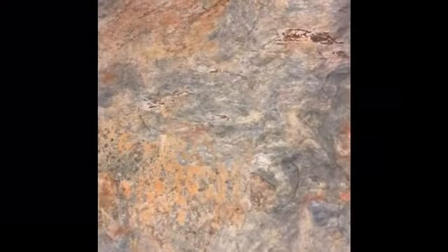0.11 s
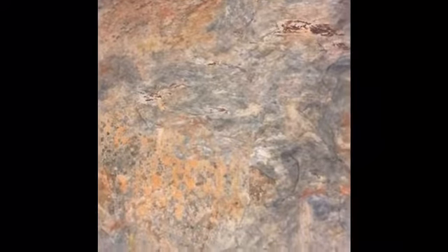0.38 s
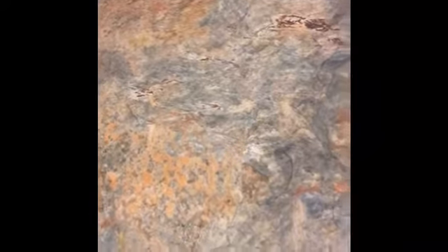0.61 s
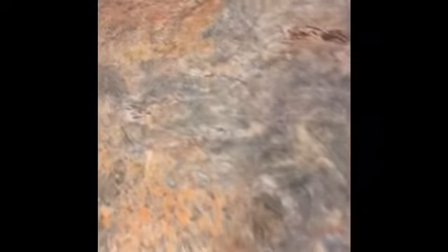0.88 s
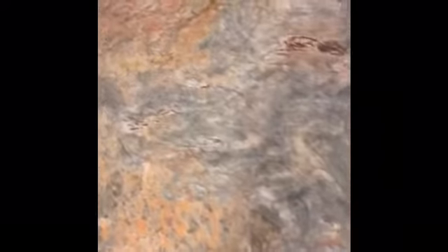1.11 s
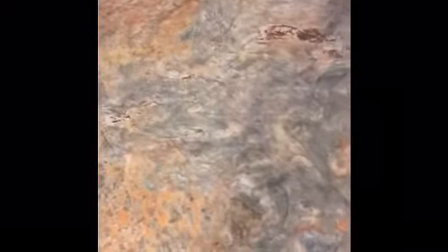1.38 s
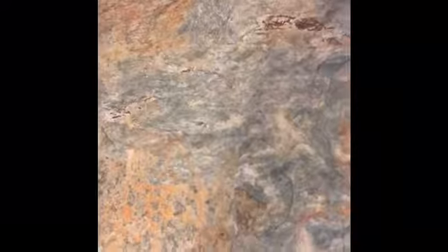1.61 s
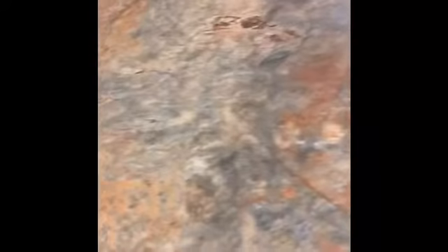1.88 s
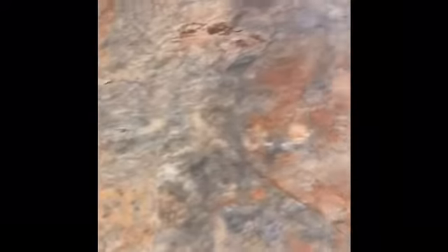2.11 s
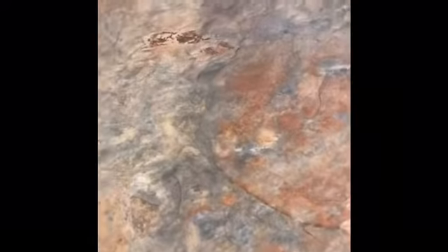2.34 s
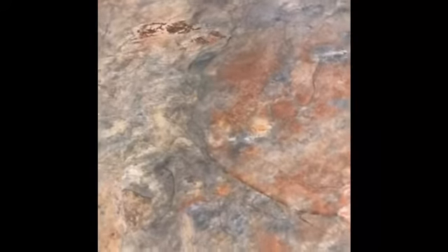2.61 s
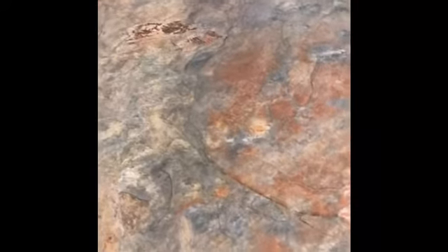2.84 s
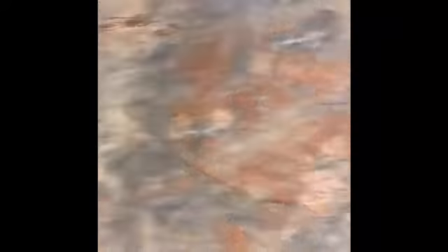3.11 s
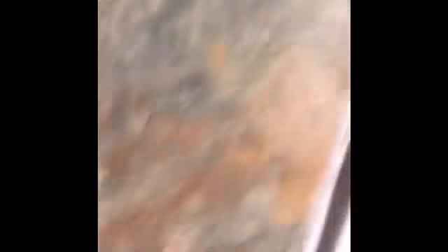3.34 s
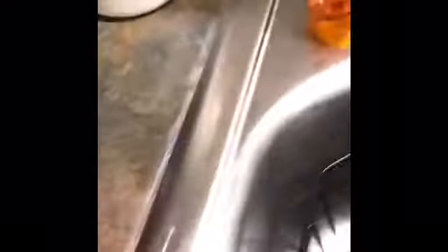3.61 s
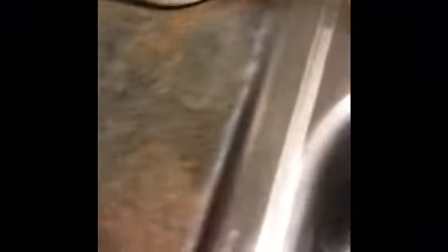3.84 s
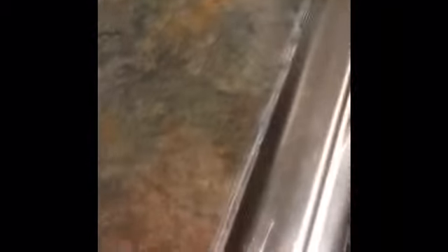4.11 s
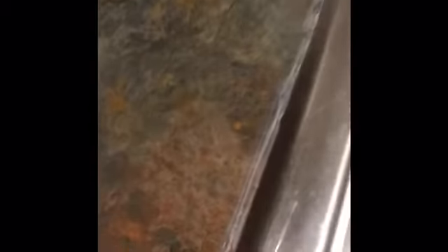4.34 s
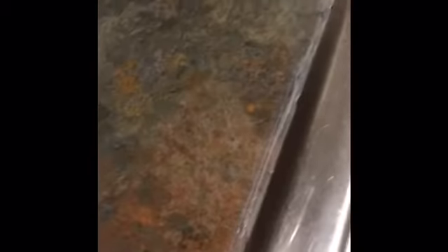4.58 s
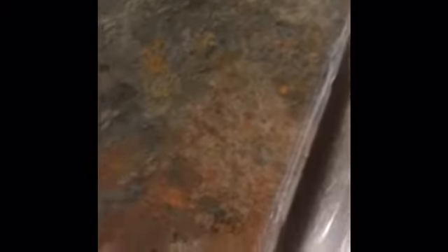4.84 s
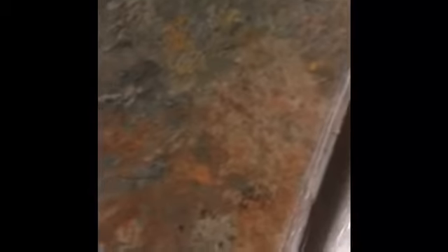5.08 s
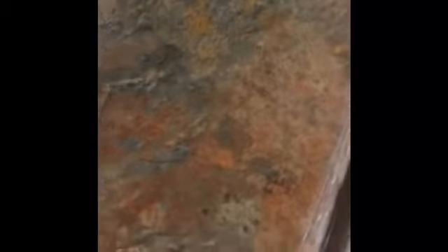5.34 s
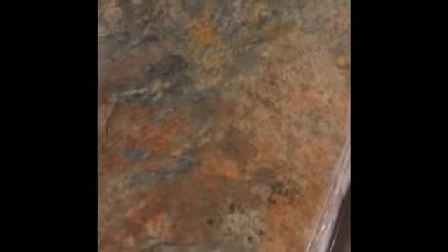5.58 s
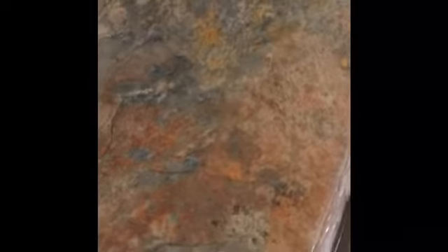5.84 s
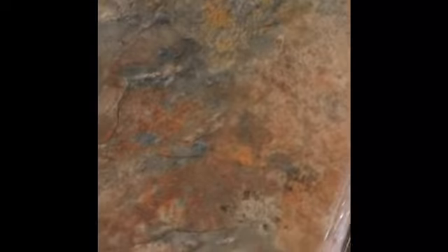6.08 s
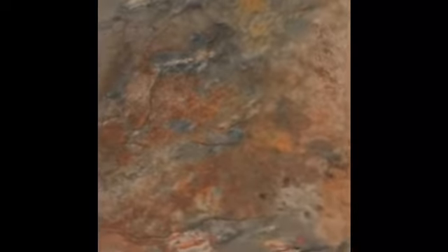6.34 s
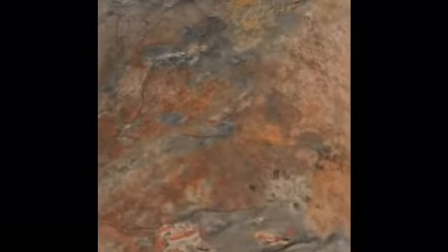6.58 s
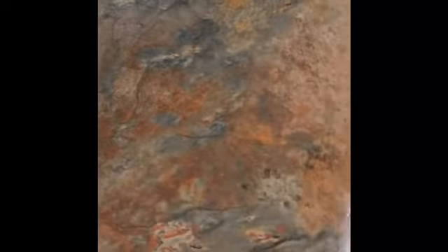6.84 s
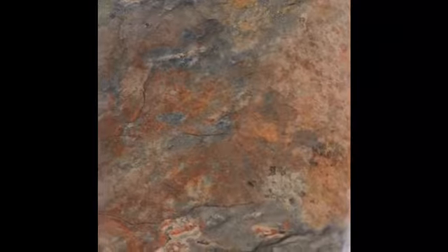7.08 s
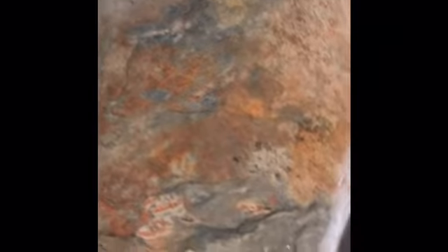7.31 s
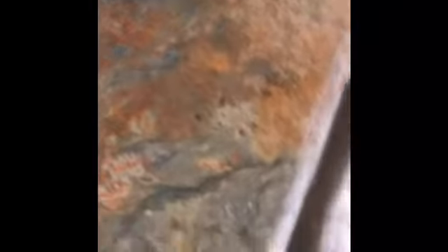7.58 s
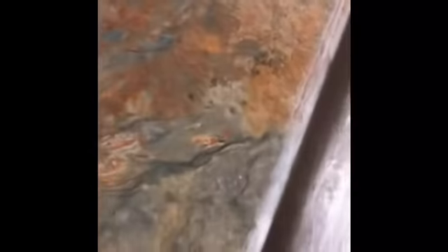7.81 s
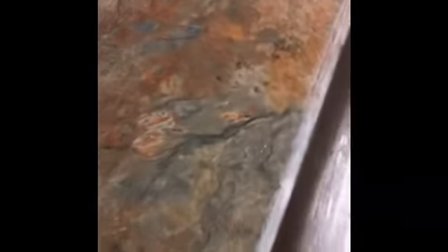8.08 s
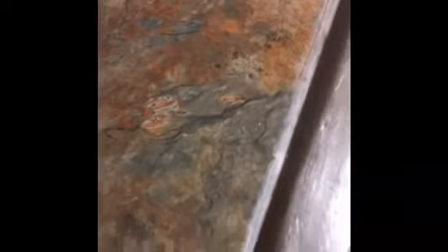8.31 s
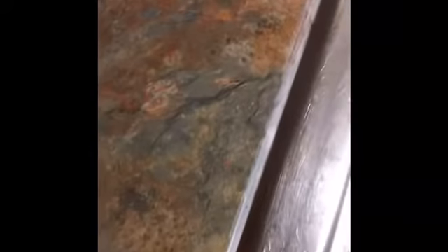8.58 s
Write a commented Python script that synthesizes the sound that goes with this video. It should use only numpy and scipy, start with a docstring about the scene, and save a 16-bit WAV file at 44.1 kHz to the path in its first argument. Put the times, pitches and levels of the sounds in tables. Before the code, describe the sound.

Tap water hisses and splashes hard into a steel pot in a metal sink, then shuts off to thuds, fizzing froth and drips.

```python
"""Water hisses and splashes hard into a steel pot in a steel sink, over a pot note that slowly sinks; then the tap
is shut, the sink thuds, froth fizzes out and drips fall over a low rumble and hum.
The jet, pot notes, froth and rumble are filtered noise; drips and plops are short bubble tones, the drips with
noisy splats; thuds are sets of fading sink tones.
A hand-held mono microphone drifts along the counter, which changes the loudness and colour of the water."""
import sys
import numpy as np
from scipy import signal
from scipy.fft import rfft, irfft, next_fast_len
from scipy.io import wavfile
from scipy.ndimage import map_coordinates

SR = 44100
rng = np.random.default_rng(int(sys.argv[2]) if len(sys.argv) > 2 else 0)


def nominal_scale(level):
    """Amplitude ratio for a level in decibels (scalar or array-like)."""
    x = np.asarray(level, float) / 20
    return 10 ** x


def int16_out(signal):
    """Quantize to a 16-bit WAV file."""
    q = np.round(np.clip(np.atleast_2d(signal).T, -1, 1) * 32767)
    wavfile.write(sys.argv[1], SR, q.astype(np.int16))


N = 383229  # length [samples]
FRAME, HOP = 2048, 512  # noise-shaping window and its step [samples]
HZ = np.fft.rfftfreq(FRAME, 1 / SR)[:, None]  # frequencies of the shaping grid
TIMES = np.arange(N // HOP + 6) * HOP / SR  # moments of the shaping grid [s]

# The moving hand: (time [s], distance [fresh reflection patterns], open view of the sink [0-1], nearness gain [dB])
TRAVEL = [(0, 0, 0.3, 1), (.9, 1.2, 0, 0), (3, 4, 0, 0.5), (3.63, 6, 0.3, 3.5), (3.9, 7, 0.5, 1.95),
          (4.7, 8.8, 0.6, 1.8), (6.1, 10.8, 1, .8), (6.5, 11.3, 0.5, 0.2), (7.7, 13, 0, 0)]
# Thuds on the sink: (time [s], level before a fixed trim [dB], clack relative to thud before a fixed lift [dB])
THUDS = [(7.393, -35, -18), (7.489, -38, 1), (7.648, -27.5, -18), (7.707, -39, -18), (8.173, -29, -27),
         (8.187, -24, -36), (8.229, -28, -30), (8.266, -29.5, -29), (8.332, -36.5, -3), (8.397, -35, -18),
         (8.509, -36.5, -10.5), (8.545, -38, -11)]
SHUT_S = 7.474  # the tap closes
HEAVY_S = 4.5  # the pot is heavy enough to shake the sink fully
FROTH_S = 7.58  # the froth begins to be heard


def unit(x):
    """Scales a sound to an rms of 1."""
    return x / np.sqrt(np.mean(x ** 2) + 1e-20)


def along(points, hz):
    """Reads (frequency [Hz], value) points on a log frequency axis."""
    f, v = np.transpose(points)
    return np.interp(np.log(hz + 1), np.log(f + 1), v)


def curves(rows, t=None):
    """Reads each column after the time, at t or at every sample."""
    s, *cols = np.transpose(rows)
    at = np.arange(N) / SR if t is None else t
    return [np.interp(at, s, c) for c in cols]


def since(s, ease=.005):
    """Seconds after moment s, near zero before it, with a rounded corner."""
    return ease * np.logaddexp(0, (np.arange(N) / SR - s) / ease)


def wobble(rate):
    """A smooth random curve with rate knots a second."""
    return map_coordinates(rng.standard_normal(N // 100), [np.arange(N) * rate / SR])


def patches(wide_hz, moments):
    """A random field over frequency and time: new values every wide_hz and at each whole step of moments."""
    grid = np.meshgrid(HZ[:, 0] / wide_hz, moments, indexing="ij")
    return map_coordinates(rng.standard_normal((400, 300)), grid, mode="wrap")


def peak(hz, width_hz):
    """Gain of a resonance over frequency, 1 at its centre."""
    return 1 / (1 + ((HZ - hz) / (width_hz / 2)) ** 2)


def shaped(gain, drive=None):
    """Noise (or drive) filtered by a gain over frequency and time, the gain scaled to power 1 at every moment."""
    drive = rng.standard_normal(N) if drive is None else drive
    z = signal.stft(drive, nperseg=FRAME, noverlap=FRAME - HOP)[2]
    gain = np.broadcast_to(gain, (len(HZ), len(TIMES)))[:, :z.shape[1]]
    gain = gain / np.sqrt(np.mean(gain ** 2, axis=0))
    return signal.istft(z * gain, nperseg=FRAME, noverlap=FRAME - HOP)[1][:N]


def add(track, s, sound):
    """Mixes a sound into the track at second s."""
    track[round(s * SR):][:len(sound)] += sound


def jet():
    """Air-filled stream: smooth hiss and splash, coloured by steel resonances and by shifting reflections."""
    # hiss heard from behind the counter edge, and with the sink in open view:
    # (frequency [Hz], relative level [dB])
    shaded_hiss = [(1500, -17), (2800, -9.5), (3500, -4), (4100, -1.5), (4800, -2.4), (5400, 1), (6200, .3),
                   (7700, -5.2), (9000, -1.8), (10450, -7.5), (11300, -2.3), (13000, -1.5), (15450, 4.2),
                   (16000, 3.5)]
    open_hiss = [(1500, -17), (2800, -8.5), (3500, -3.5), (4500, -1.3), (5400, 2.5), (6700, 1.8),
                 (7300, -5.5), (9000, -2.8), (10400, -8.5), (11300, -3), (12500, -2.5), (14200, .8),
                 (15100, 4), (16000, 4)]
    # the splash in the pot: (frequency [Hz], relative level [dB])
    splash_tone = [(280, -74), (470, -19.5), (613, -7), (1020, -6.5), (1360, -2), (1720, 0.5), (1910, -3.5),
                   (2230, -0.5), (2840, -4.5), (3200, -5.5), (4160, -26), (7040, -120)]
    # steel resonances, each beamed toward one stretch of the hand's path: (frequency [Hz], width [Hz],
    # boost [dB], lobe centre [reflection patterns], lobe half-width [reflection patterns])
    steel = [(625, 70, 3, 12, 1.5), (1355, 80, 4.5, 6, 7), (1680, 130, 3, 2.1, 2.6),
             (1760, 110, 3.5, 11, 2.5), (2210, 100, 3.5, 5, 8), (2590, 80, 2.5, 9.6, 1.5),
             (3055, 75, 4, 2.1, 2.5), (3670, 55, 4, 3.1, 1), (3630, 50, 4, 11.5, 1.8),
             (4100, 50, 3.5, 6, 8), (4310, 55, 3, 6, 8), (4800, 130, 4, 9.9, 1.5), (5110, 80, 3.5, 11, 1),
             (5120, 70, 4, 2.5, .7), (5350, 600, 4, 6.6, 1.5), (5460, 90, 3.5, 12, 1.2),
             (5740, 80, 3, 6, 8), (5900, 90, 3.5, 5, 1.1), (6600, 150, 3, 11, 2.2), (8630, 60, 4, 9.8, .8),
             (8940, 200, 2, 6, 9), (11690, 70, 4, 3.3, .9), (12900, 75, 4, 10, 1.1)]
    hiss_db, hiss_fall_db_s = -22.5, 146  # level before nearness; fall once shut
    splash_db, splash_fall_db_s = -38, 79
    splash_near = 0.76  # share of the nearness gain that the splash follows
    lobe_edge = 0.93  # stretch of path over which a lobe fades in

    travel, view, _ = curves(TRAVEL, TIMES)
    near_db = curves(TRAVEL)[2]
    shut = since(SHUT_S, ease=0.014)
    steel_db = 0
    for hz, width, db, centre, half in steel:
        lobe = np.clip((half - abs(travel - centre)) / lobe_edge + .5, 0, 1)
        steel_db = steel_db + db * peak(hz, width) * lobe
    # nearby surfaces draw fine ripples in the spectrum that change as the microphone moves
    ripple = patches(58, travel)
    ripple_db = 2.8 * ripple - .5 * ripple ** 2  # interference cuts deeper than it lifts
    colour = nominal_scale(steel_db + ripple_db)

    hiss_tone_db = (1 - view) * along(shaded_hiss, HZ) + view * along(open_hiss, HZ)
    hiss = shaped(colour * nominal_scale(hiss_tone_db))
    splash = shaped(colour * nominal_scale(along(splash_tone, HZ)))
    hiss_gain = nominal_scale(hiss_db + near_db - hiss_fall_db_s * shut)
    splash_gain = nominal_scale(splash_db + splash_near * near_db - splash_fall_db_s * shut)
    flutter_db = .4 * wobble(9)
    return nominal_scale(flutter_db) * (hiss_gain * hiss + splash_gain * splash)


def note(hz, db, breadth, throb_db, lift_db=0):
    """Turbulence drives one mode: narrow noise on a fixed or moving pitch, in uneven throbs."""
    still_s = 7.8  # the pot falls still
    fade = np.clip((still_s - np.arange(N) / SR) / 0.065, 0, 1)
    tone = shaped(peak(hz, breadth * hz) ** 0.86 * nominal_scale(lift_db))
    return fade * nominal_scale(db + throb_db * wobble(9)) * tone


def pot():
    """The lowest note sinks as water loads the walls; the bare bottom and a sink mode sound with it."""
    # sink modes that lift the note as it passes: (frequency [Hz], width [Hz], lift [dB])
    sink_lift = [(240.4, 13, 8), (337, 22, 7), (370, 29, 8)]
    full_s = 7.4  # the water's load stops growing
    empty_hz, load = 445.6, 0.85  # pitch = empty pitch / (1 + load * depth)
    pot_db, wet_s = -46.5, 1.14  # base level; time to speak
    pot_near, settle_db = 0.48, -2  # share of the nearness gain; loss once full
    bottom_hz, bottom_db, bottom_sag_hz_s = 668, -45, 165  # bare bottom, and its sinking once covered
    covered_s = .22  # the first water drowns the bottom note
    drowned_db, drown_s, drown_db_s = -7, .08, 9  # quick loss, its time, the slow fade after
    bowl_hz, bowl_db, bowl_grows_db = 363, -57, 7  # a sink mode, shaken harder until the pot is heavy

    t = np.arange(N) / SR
    depth = np.sin(np.pi / 2 * np.minimum(TIMES / full_s, 1))
    speaks_db = 20 * np.log10(1 - np.exp(-(t / wet_s) ** 2) + 0.043)
    settled_db = settle_db * np.minimum(t / full_s, 1) ** 4
    lowest_db = pot_db + speaks_db + pot_near * curves(TRAVEL)[2] + settled_db
    lift_db = sum(db * peak(hz, width) for hz, width, db in sink_lift)
    lowest = note(empty_hz / (1 + load * depth), lowest_db, breadth=0.27, throb_db=1.8, lift_db=lift_db)

    sinking_hz = np.maximum(bottom_hz - bottom_sag_hz_s * np.maximum(TIMES - covered_s, 0), 300)
    covered = since(covered_s)
    fading_db = bottom_db + drowned_db * np.tanh(covered / drown_s) - drown_db_s * covered
    bottom = note(sinking_hz, fading_db, breadth=0.055, throb_db=-1.0)

    growing_db = bowl_db - bowl_grows_db * (1 - np.minimum(t / HEAVY_S, 1))
    bowl = note(bowl_hz, growing_db, breadth=0.1, throb_db=2.5)
    return lowest + bottom + bowl


def ring(modes, t, attack):
    """Fading tones of struck steel, at new strengths and slightly new pitches for each blow."""
    total = 0
    for (hz, db, t60), chance in zip(modes, rng.standard_normal(len(modes))):
        tone = np.sin(2 * np.pi * hz * (1 + 0.0066 * chance) * t)
        total = total + nominal_scale(db + 1.9 * chance - 60 * t / t60) * tone
    return (1 - np.exp(-t / attack)) * total


def thuds():
    """Soft blows ring the sink bowl; their hard edge clacks the upper modes with a short scuff."""
    # sink bowl modes: (frequency [Hz], relative level [dB], time to fall 60 dB [s])
    bowl_modes = [(82.7, 0.5, 0.3), (107.8, -6, 0.88), (189, -4.5, 0.25), (259, -10, 0.14), (316, -3, 0.13),
                  (372, -17, 0.77), (463, -13, 0.094), (570, -12, 0.07)]
    # upper modes, rung by hard contact: (frequency [Hz], relative level [dB], time to fall 60 dB [s])
    rim_modes = [(646, 2, 0.11), (850, -11, 0.65), (944, -1, 0.11), (1104, 0, 0.15), (1310, -4, 0.15),
                 (1450, -4, 0.17), (1830, -10, .06)]
    out, t = np.zeros(N + SR), np.arange(SR // 2) / SR
    for s, db, clack_db in THUDS:
        rough = np.convolve(rng.standard_normal(len(t)), np.hanning(14) / 3, "same")
        scuff = 0.92 * rough * nominal_scale(-60 * t / 0.23)
        thud = ring(bowl_modes, t, attack=0.0024)
        clack = ring(rim_modes, t, attack=0.005) + scuff
        add(out, s, nominal_scale(db - 7.5) * (thud + nominal_scale(clack_db + 4) * clack))
    return out[:N]


def spray(spikes, size_db):
    """White noise plus droplet ticks of scattered but bounded size."""
    hit, size, sign = rng.random((3, N))
    tick_size = nominal_scale(-size_db * np.log(size + .02))
    ticks = (hit < .03) * tick_size * np.sign(sign - .5)
    return unit(rng.standard_normal(N) + spikes * unit(ticks))


def froth():
    """Bursting froth and a trickle, uncovered as the jet dies, with the sink still singing faintly."""
    # trickle and fizz: (frequency [Hz], relative level [dB])
    trickle_tone = [(110, -20), (180, -2), (219, -23), (257, -13), (285, -5.5), (446, -15.5), (483, -11.5),
                    (951, -20), (1370, -16), (1920, -23.5), (2800, -44), (3640, -52), (6160, -120)]
    fizz_tone = [(1290, -28), (2200, -7.5), (2680, -2.5), (3160, -5), (3520, -5.5), (7710, -11),
                 (8650, -8.5), (10500, -16), (12600, -12), (15800, -13)]
    # the sink singing under the trickle: (frequency [Hz], width [Hz], level [dB rms])
    sink_song = [(1378, 30, -62), (5380, 80, -74)]
    gurgle_db, gurgle_fall_db_s, trickle_db = -32.5, 142, -56.5  # first gurgle over a lasting trickle
    fizz_db, fizz_fall_db_s, fizz_patch_db = -45, 20.5, 2  # start, fall, unevenness

    after = since(FROTH_S)
    rise = np.clip(after / 0.2, 0, 1)
    low = nominal_scale(gurgle_db - gurgle_fall_db_s * after) + nominal_scale(trickle_db)
    trickle = low * nominal_scale(2.3 * wobble(25)) * shaped(nominal_scale(along(trickle_tone, HZ)))
    uneven_db = fizz_patch_db * patches(450, TIMES / 0.025)
    fizz = shaped(nominal_scale(along(fizz_tone, HZ) + uneven_db), spray(spikes=0.73, size_db=3.3))
    fizz = fizz * nominal_scale(fizz_db - fizz_fall_db_s * after + 2.6 * wobble(60))
    singing = sum(nominal_scale(db) * shaped(peak(hz, width)) for hz, width, db in sink_song)
    song_fade = np.clip((8.62 - np.arange(N) / SR) / .15, 0, 1)
    return rise * (trickle + fizz + singing * song_fade)


def small_drips(count):
    """Rows for faint drips at random moments after the froth starts, ever fainter."""
    when, size, pitch = rng.random((count, 3)).T
    late = when * (N / SR - FROTH_S)
    db = -48 - 13 * late - 4 * size  # falls 13 dB a second, and scatters
    hz = 4500 * np.exp(1.3 * (pitch - .5))
    return zip(FROTH_S + late, db, hz, np.full(count, -4))


def drips():
    """Each drop: a bright splat, strongest near the pitch of the small bubble it traps."""
    # the loudest drips: (time [s], level [dB], bubble pitch [Hz], splat relative to bubble [dB])
    loud_drips = [(7.6944, -41, 11000, -6), (7.731, -45, 3680, 1), (7.7717, -41, 9200, -6),
                  (7.7982, -30.5, 3680, -2), (7.8381, -35, 2430, -8), (7.8624, -41, 2460, 0),
                  (7.8944, -46, 2130, -2), (7.9244, -48, 2570, -6), (8.038, -47, 2730, -5),
                  (8.0586, -43.5, 7200, 2), (8.1045, -47, 6660, 0), (8.1344, -46, 6300, -11),
                  (8.157, -32.5, 6700, -6), (8.172, -46, 13100, 3), (8.2397, -47, 6170, -6),
                  (8.2731, -46, 8700, -1), (8.4023, -44, 12600, -14)]
    bubble_t60_s = .022  # time for a bubble to fall 60 dB
    out, t = np.zeros(N + SR), np.arange(SR // 10) / SR
    for s, db, hz, splat_db in [*loud_drips, *small_drips(count=10)]:
        flutter = np.convolve(rng.standard_normal(len(t)), np.hanning(30) / 4, "same")
        ragged = (0.8 + .3 * flutter) * np.sin(2 * np.pi * hz * t)
        bubble = 1.5 * ragged * nominal_scale(-60 * t / bubble_t60_s) * (1 - np.exp(-t / 0.0006))
        noise = rng.standard_normal(len(t) + 1)
        bright = (noise[1:] - 0.3 * noise[:-1]) * 0.41
        smooth = np.convolve(noise[1:], np.hanning(9) / 2, "same")
        near_pitch = 0.97 * smooth * np.cos(2 * np.pi * hz * t)
        splat_fade = nominal_scale(-60 * t / 0.011) + 0.48 * nominal_scale(-60 * t / 0.09)  # a quick and a slow part
        splat = (bright + near_pitch) * splat_fade
        add(out, s, nominal_scale(db) * (bubble + nominal_scale(splat_db) * splat))
    return out[:N]


def plops():
    """A soft-starting bubble tone whose pitch rises as it nears the surface."""
    # larger bubbles under the heaviest drops: (time [s], level before a fixed lift [dB], nominal pitch [Hz])
    big_bubbles = [(7.574, -31, 1630), (7.799, -34.5, 645), (7.865, -43, 1110)]
    out, t = np.zeros(N + SR), np.arange(SR // 10) / SR
    for s, db, hz in big_bubbles:
        tone = np.sin(2 * np.pi * hz * t * (.96 + 1.5 * t))
        envelope = nominal_scale(db + 2.0 - 60 * t / 0.042) * (1 - np.exp(-t / .003))
        add(out, s, envelope * tone)
    return out[:N]


def rumble():
    """Low pipe noise over a steady mains hum; it grows with the load and flares after each thud."""
    # pipe noise: (frequency [Hz], relative level [dB])
    pipe_tone = [(15, -47), (25, -40), (54, -9), (97, 7.5), (130, -11), (183, -4), (220, -1.5), (290, -31),
                 (480, -120)]
    # mains hum: (frequency [Hz], level [dB rms])
    mains = [(59.5, -57.5)]
    empty_db, grows_db, shut_db = -60, 5.5, -3  # empty pot, growth until heavy, change once shut
    shake_db, shake_t60_s = -21.5, 0.7  # flare relative to the thud's table level; time to fall 60 dB

    t = np.arange(N) / SR
    hum = sum(nominal_scale(db) * np.sqrt(2) * np.sin(2 * np.pi * hz * t) for hz, db in mains)
    m = next_fast_len(N)
    pipe_gain = nominal_scale(along(pipe_tone, np.fft.rfftfreq(m, 1 / SR)))
    low = irfft(rfft(rng.standard_normal(m)) * pipe_gain, m)[:N]
    growth_db = grows_db * np.minimum(t / HEAVY_S, 1)
    closing_db = shut_db * np.minimum(since(SHUT_S) / .1, 1)
    flow = nominal_scale(empty_db + growth_db + closing_db)
    shaken = np.zeros(N + SR)
    for s, db, _ in THUDS:
        add(shaken, s, nominal_scale(db + shake_db - 60 * t[:SR] / shake_t60_s))
    return hum + (flow + shaken[:N]) * nominal_scale(2.3 * wobble(7)) * unit(low)


def scene():
    """All sources at one microphone, copied to both channels."""
    mono = jet() + pot() + thuds() + froth() + drips() + plops() + rumble()
    return np.array([mono, mono])


def band_limit(x):
    """A steep low-pass at the top of the band."""
    return signal.sosfilt(signal.butter(12, 17090, fs=SR, output="sos"), x)


def record(dry):
    """Removes everything above a steep treble limit and returns the finished sound."""
    top_hz = 15810  # nothing passes above this
    m = next_fast_len(N + SR)
    passed = np.clip((top_hz - np.fft.rfftfreq(m, 1 / SR)) / 50, 0, 1)
    mix = irfft(rfft(dry, m) * passed, m)[:, :N]
    return band_limit(mix)


dry = scene()
out = record(dry)
int16_out(out)
```